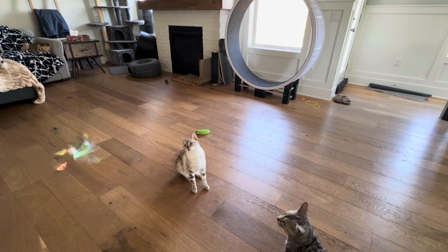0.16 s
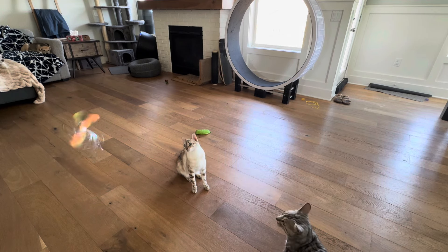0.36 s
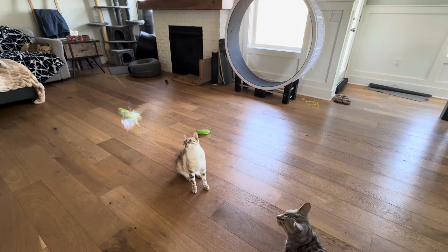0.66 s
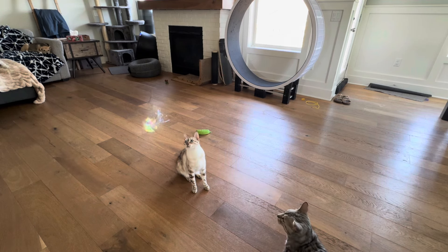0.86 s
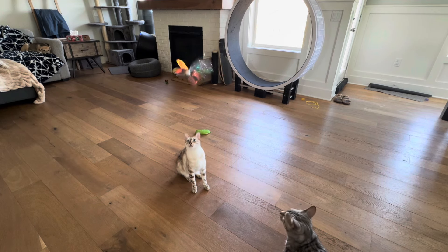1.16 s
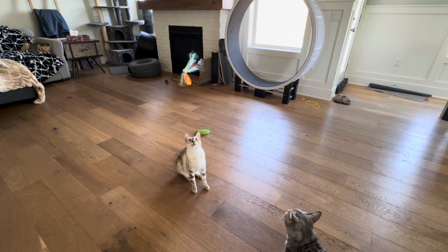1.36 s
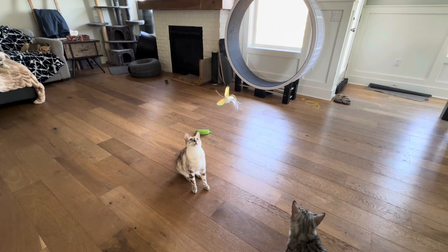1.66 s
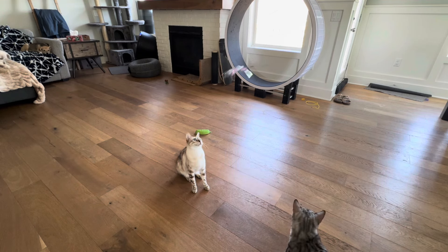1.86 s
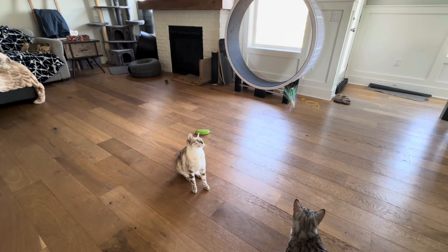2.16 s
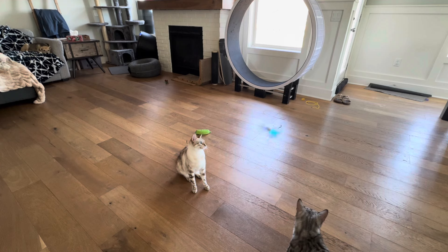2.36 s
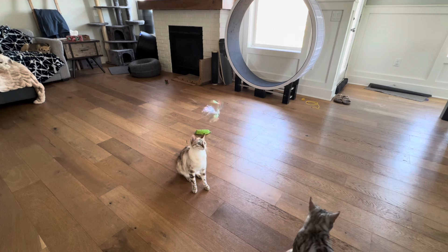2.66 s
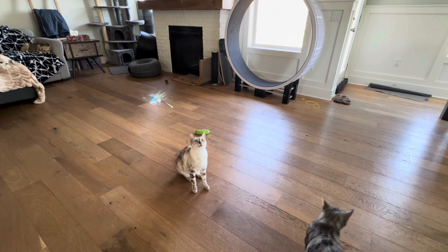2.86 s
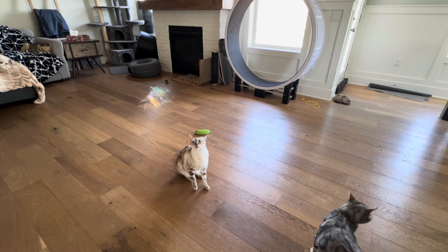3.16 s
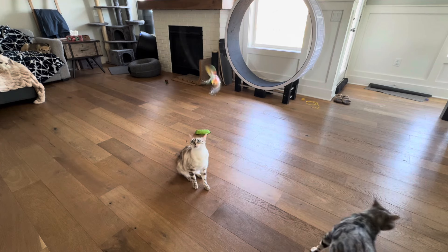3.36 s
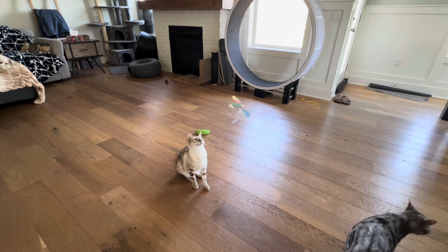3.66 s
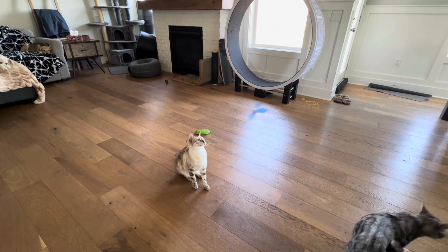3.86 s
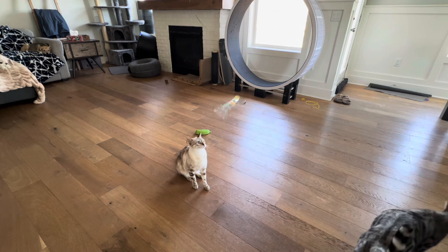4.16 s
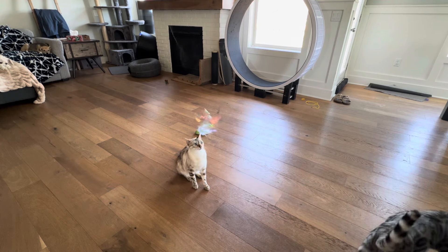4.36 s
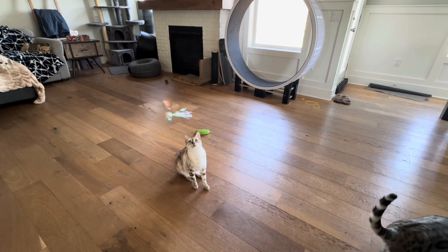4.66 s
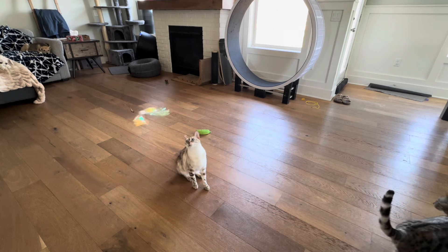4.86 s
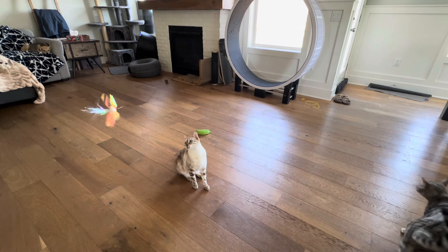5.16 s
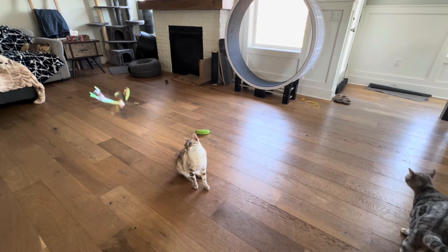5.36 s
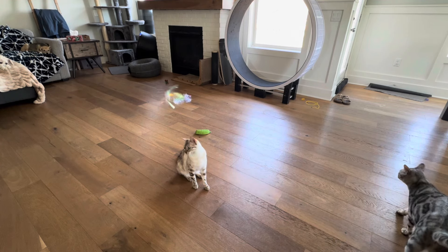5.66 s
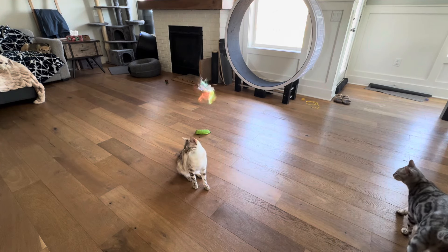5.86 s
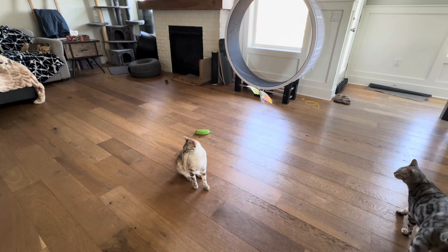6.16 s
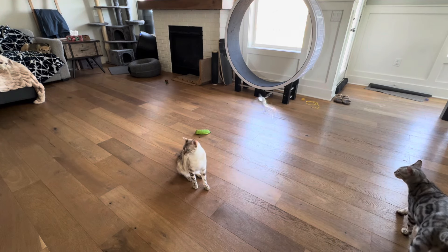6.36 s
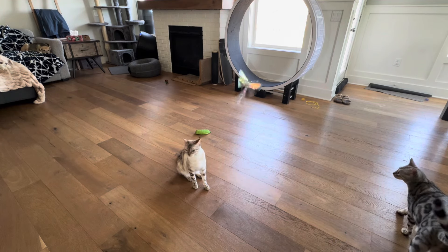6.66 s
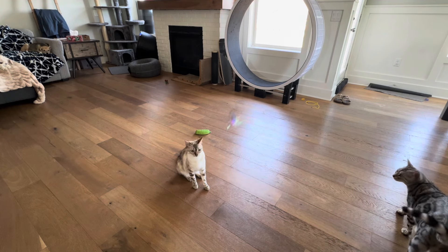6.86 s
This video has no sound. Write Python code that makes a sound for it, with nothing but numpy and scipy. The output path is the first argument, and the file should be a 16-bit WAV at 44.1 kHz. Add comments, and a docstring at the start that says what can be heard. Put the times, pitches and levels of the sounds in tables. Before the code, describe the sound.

A steady, quiet ventilation rush with a wavering low hum lies under the whole seven seconds in a lively, hard-floored living room. At 0.13 s a feather-and-tinsel lure snaps crisply, with a wand tick and a small papery pop; softer jerks follow at 0.4, 0.64 and 0.87, then a clearer snap at 1.1 and a flick at 1.3. From 1.4 to 2 only faint trailing rustle and a tiny tick remain. Activity peaks from 2.0 to 3.1: swishing flutter at 2.2, hard bright snaps at 2.4 and 2.65, flicks near 3.0, with deep soft rumble swelling from 2.7 to 3.4. Uneven crinkling jerks continue, with another rumble around 4.0 to 4.8 and a sharp tick at 4.6. Things soften around 5, then very bright ticks strike at 5.8, more snaps follow at 6.07, 6.25 and 6.47, and a strong glittery wing flick closes at 6.95.

```python
"""A low ventilation hum is heard first; at once a feather-and-tinsel lure on a wand starts to snap and flutter.
Each jerk is a burst of tiny random clicks shaped as a sharp snap and a swelling flutter; wings crinkle and pop.
The wand ticks as short bursts of bright noise, and a bare living room adds a decaying diffuse ring.
Underneath, filtered noise and wavering tones make the ventilation, and an unsteady low tone swells as a rumble."""
import sys
import numpy as np
from scipy import signal
from scipy.fft import rfft, irfft, next_fast_len
from scipy.io import wavfile

SR = 44100
rng = np.random.default_rng(int(sys.argv[2]) if len(sys.argv) > 2 else 0)


def to_wav(s):
    """Save 16-bit WAV."""
    ch = np.atleast_2d(s).T  # columns
    pcm = np.round(np.clip(ch, -1, 1) * 32767)  # PCM
    wavfile.write(sys.argv[1], SR, pcm.astype(np.int16))


N = 309141
TIME = np.arange(N) / SR


def from_db(db):
    """Decibel law: 20 dB is a factor of ten in amplitude."""
    return 10 ** (np.asarray(db) / 20)


def rms_one(x):
    """Power normalisation: scale to a mean square of one."""
    return x / np.sqrt(np.mean(x ** 2) + 1e-20)


def at_hz(points, hz):
    """Interpolation of a table along a logarithmic frequency axis."""
    known_hz, values = np.transpose(points)
    return np.interp(np.log(np.maximum(hz, 1)), np.log(known_hz), values)


def colour(x, points, size=16384):
    """Minimum-phase filtering: the folded cepstrum gives a causal filter with the tabled dB curve."""
    curve_db = at_hz(points, np.fft.rfftfreq(size, 1 / SR))
    cepstrum = irfft(np.log(from_db(curve_db)))
    cepstrum[1:size // 2] *= 2
    cepstrum[size // 2 + 1:] = 0
    response = irfft(np.exp(rfft(cepstrum)))[:size // 2]
    padded = next_fast_len(N + size, real=True)
    return irfft(rfft(x, padded) * rfft(response, padded), padded)[..., :N]


def split(x, hz, order):
    """Crossover: Butterworth filters give the parts below and above one frequency."""
    filters = [signal.butter(order, hz, side, fs=SR, output="sos") for side in ("low", "high")]
    return [signal.sosfilt(sections, x) for sections in filters]


def port_lag(x):
    """Propagation delay: about a third of a millisecond between the ports."""
    return np.roll(x, 16)


def crackle(per_s, spread_db):
    """Random impulse process: tiny buckling clicks of uneven size and either sign, at unit power."""
    born = rng.random(N) < per_s / SR
    chance = rng.standard_normal(N)[born]
    clicks = np.zeros(N)
    clicks[born] = np.sign(chance) * from_db(spread_db * np.minimum(abs(chance), 2.7))
    return rms_one(clicks)


def snap_shape(age, length, attack_s=0.0023):
    """Abrupt arrest: the strands whip round, pull taut and stop within milliseconds."""
    return (1 - np.exp(-age / attack_s)) * np.exp(-(age / length) ** 3)


def flutter_shape(age, length):
    """Half-sine envelope: a swing swells and fades."""
    return np.sin(np.pi * np.minimum(age / length, 1))


def strokes(rows, shape):
    """Incoherent addition: overlapping strokes add in power, for a sound and its parts (dB above it)."""
    power = np.zeros((len(rows[0]) - 2, N))
    for start, level_db, length, *parts_db in rows:
        span = slice(int(start * SR), int((start + np.pi * length) * SR))
        envelope = shape(np.maximum(TIME[span] - start, 0), length)
        gains = from_db(level_db + np.array([0, *parts_db]))
        power[:, span] += np.outer(gains, envelope) ** 2
    return np.sqrt(power)


def flapping(per_s, depth_db):
    """Random amplitude modulation: uneven beating of loose strands, as a gain around 1."""
    beats = rng.standard_normal(N)
    return rms_one(from_db(depth_db * np.interp(TIME * per_s, np.arange(N), beats)))


# spectrum of the air rush: (frequency [Hz], relative density [dB per Hz])
AIR_SPECTRUM = [(20, -33), (35, -10), (55, -3.5), (72, -3), (140, -3.5), (400, -3.5), (520, -12.5),
                (2000, -28.5), (4000, -32), (9000, -33), (15000, -37)]
# likeness of its left and right channels: (frequency [Hz], correlation [-1 to 1])
AIR_CORRELATION = [(40, 0.69), (100, 0.54), (250, 0.73), (500, 0)]
# motor and duct tones: (frequency [Hz], width [Hz], level [dB], left over right [dB])
HUM_TONES = [(56.6, 4.6, -62.5, -2), (84.7, 5, -69.5, -6), (120.2, 2.2, -64, 9), (204.2, 2.5, -69, -8)]


def ventilation(air_db=-58.0):
    """Partial coherence and narrow-band noise: a low rush, unlike left to right in the treble, with wavering tones."""
    size = 2 * next_fast_len(N // 2 + 1)
    alike = at_hz(AIR_CORRELATION, np.fft.rfftfreq(size, 1 / SR))
    white = rfft(rng.standard_normal((2, size)))
    mid, side = irfft(white * np.sqrt([1 + alike, 1 - alike]))[:, :N]
    out = from_db(air_db) * rms_one(colour(np.array([mid + side, mid - side]), AIR_SPECTRUM))
    for hz, width, level_db, pan_db in HUM_TONES:
        knots = rng.standard_normal((2, SR // 100))
        waver = np.interp(TIME * 2 * width, np.arange(knots.shape[1]), knots[0] + 1j * knots[1])
        # the narrower the tone, the steadier its level
        waver = waver / (abs(waver) + 1e-9) ** (1 / (1 + width ** 2))
        tone = rms_one(np.real(waver * np.exp(2j * np.pi * hz * TIME)))
        out = out + tone * from_db([[level_db + pan_db / 2], [level_db - pan_db / 2]])
    return out


# swells of the rumble: (time [s], level [dB], length [s])
RUMBLE_SWELLS = [(1.2, -56, 0.16), (2.73, -49.5, 0.24), (2.97, -52, 0.15), (3.173, -52.5, 0.2),
                 (4.0, -50.5, 0.27), (6.16, -57, 0.27)]


def rumble(boom_hz=56.8, wander_hz=3.7, wanders_per_s=40):
    """Frequency modulation: a deep boom of unsteady pitch swells and fades, alike at both ports."""
    gain = strokes(RUMBLE_SWELLS, flutter_shape)[0]
    wander = np.interp(TIME * wanders_per_s, np.arange(N), rng.standard_normal(N))
    hz = boom_hz + wander_hz * wander
    return gain * rms_one(np.sin(2 * np.pi * np.cumsum(hz) / SR))


# reverberation time, the fall through 60 dB: (frequency [Hz], time [s])
REVERBERATION_TIME = [(400, 0.7), (1400, 0.56), (3500, 0.52), (8000, 0.41), (15000, 0.3)]


def room_response(wet_db=0.7, bass_wet_db=3.5, top_wet_db=-1.0, first_s=0.0015,
                  wall_s=0.056, wall_spread_s=0.0046, wall_share=0.24):
    """Diffuse-field decay: noise dies exponentially band by band, denser where wall and ceiling echoes cluster."""
    age = TIME[:2 ** 15]
    hz = np.fft.rfftfreq(len(age), 1 / SR)
    white = rfft(rng.standard_normal((2, len(age))))
    echoes = np.sqrt(1 + wall_share * np.exp(-((age - wall_s) / wall_spread_s) ** 2))
    onset = (1 - np.exp(-(age / first_s) ** 2)) * echoes
    # bass and top levels are offsets from wet_db
    tilt = [(1500, bass_wet_db), (8000, 0.0043), (14000, top_wet_db)]
    edges = np.geomspace(200, SR / 2, 9)
    response = 0
    for low, high in zip(edges, edges[1:]):
        centre = np.sqrt(low * high)
        decay = onset * np.exp(-np.log(1000) * age / at_hz(REVERBERATION_TIME, centre))
        gain = from_db(wet_db + at_hz(tilt, centre))
        band = irfft(white * ((hz >= low) & (hz < high)))
        response = response + gain * decay / np.linalg.norm(decay) * band
    return response


def direct_response(scatter_db=-0.5, scatter_s=0.00066, shadow_db=4.0):
    """Interaural-like delay and shadow: the left port hears later and weaker; near surfaces smear the sound."""
    age = TIME[:SR // 100]
    response = rng.standard_normal((2, len(age))) * np.exp(-age / scatter_s)
    response *= from_db(scatter_db) / np.linalg.norm(response, axis=1, keepdims=True)
    response[:, 0] = 1
    response[0] = port_lag(response[0])
    shadow = from_db([[-shadow_db / 2], [shadow_db / 2]])
    return response * shadow / np.hypot(1, from_db(scatter_db))


def moving(x, make_response, count=3):
    """Time-varying convolution: the toy moves, so each third of a second takes the next of a cycle of paths."""
    responses = [make_response() for _ in range(count)]
    block = SR // 3
    out = np.zeros((2, N + 2 * SR))
    for k, start in enumerate(range(0, N, block)):
        heard = signal.fftconvolve(x[None, start:start + block], responses[k % count], axes=1)
        out[:, start:start + heard.shape[1]] += heard
    return out[:, :N]


# sharp contacts of wand, line and lure, some full and some thin:
# (time [s], relative level [dB], low cut [Hz])
WAND_TICKS = [(0.134, -23.5, 1200), (1.099, -20, 900), (1.157, -24, 4000), (1.681, -27, 2500),
              (2.412, -18, 2000), (3.043, -22, 1500), (3.523, -21.5, 7000), (3.972, -20.5, 4500),
              (4.026, -21.5, 2000), (4.564, -30, 3500), (4.592, -18, 1000), (4.976, -35, 4000),
              (5.778, -17.5, 7500), (5.815, -13.5, 7000), (6.067, -22, 3000), (6.248, -16, 2000),
              (6.485, -18, 4000), (6.652, -24.5, 5000), (6.827, -25, 4000)]
# their thin, hard spectrum: (frequency [Hz], relative density [dB per Hz])
TICK_SPECTRUM = [(500, -4.5), (2000, 2.5), (6000, -1), (9000, 3.5), (14500, 5.5), (16000, 5)]


def wand(tick_db=0.5, full_length_s=0.0077, length_follows=0.34, count=3):
    """Impact excitation: a bright rattle differs by direction; weaker contacts are shorter, each with its low cut."""
    clicks = np.array([crackle(per_s=15000, spread_db=3.5) for _ in range(count)])
    rattle = rms_one(colour(clicks, TICK_SPECTRUM))
    out = np.zeros((count, N))
    for start, level_db, low_cut_hz in WAND_TICKS:
        length = full_length_s * from_db(length_follows * level_db)
        span = slice(int(start * SR), int((start + np.pi * length) * SR))
        envelope = snap_shape(TIME[span] - TIME[span][0], length)
        tick = from_db(tick_db + level_db) * envelope * rattle[:, span]
        out[:, span] += signal.lfilter(*signal.butter(1, low_cut_hz, "high", fs=SR), tick)
    return out


# a wing pops taut, at a pitch set by how it is bent: (time [s], frequency [Hz], relative level [dB])
TAUT_POPS = [(0.165, 3880, -36.5), (1.307, 2050, -37), (4.125, 2800, -36), (5.659, 1220, -43.5),
             (6.954, 1450, -35.5)]


def wing_pops(length_s=0.0064, quality=1.7, count=3):
    """Damped resonance: a burst of crackles excites one mode of the taut wing."""
    out = np.zeros((count, N))
    drive = np.array([crackle(per_s=SR / 10, spread_db=3) for _ in range(count)])
    for start, hz, level_db in TAUT_POPS:
        span = slice(int(start * SR), int((start + np.pi * length_s) * SR))
        ringing = signal.lfilter(*signal.iirpeak(hz, quality, fs=SR), drive[:, span])
        envelope = snap_shape(TIME[span] - TIME[span][0], length_s)
        out[:, span] += from_db(level_db) * envelope * rms_one(ringing)
    return out


# jerks of the lure, each a snap and then a flutter: (time [s], relative snap level [dB], snap length [s],
# flutter level [dB], flutter length [s], relative body level [dB], relative tinsel sheen level [dB])
LURE_JERKS = [(0.136, -31, 0.0064, -51, 0.043, 6, -1), (0.404, -38.5, 0.0088, -53.5, 0.075, 5, 0.5),
              (0.64, -40.5, 0.015, -41, 0.067, 1.5, -2), (0.874, -33.5, 0.013, -41, 0.078, -1.5, -3),
              (1.099, -30, 0.0073, -51.5, 0.1, 5, -1), (1.303, -35.5, 0.014, -48.5, 0.075, -0.5, 2),
              (2.024, -31.5, 0.0095, -43.5, 0.072, -2, 0), (2.181, -29.5, 0.013, -33, 0.068, 1.5, 2.5),
              (2.412, -23.5, 0.0069, -40.5, 0.082, 2.5, 0.5), (2.526, -36.5, 0.0085, -39, 0.034, 1.5, 1.5),
              (2.657, -21.5, 0.015, -39, 0.047, -2, 5), (2.953, -34.5, 0.0087, -50.5, 0.11, 4.5, 1),
              (3.104, -31.5, 0.022, -36.5, 0.11, -0.5, 1.5), (3.325, -36, 0.018, -37.5, 0.078, 3.5, 3.5),
              (3.512, -38, 0.0047, -45, 0.081, 8, 3.5), (3.764, -30.5, 0.018, -41, 0.017, 1, 5.5),
              (3.898, -37, 0.012, -48.5, 0.047, 4, 2), (4.119, -29, 0.01, -45, 0.08, 2, 2.5),
              (4.535, -43.5, 0.012, -68, 0.042, 7, 0), (4.594, -28, 0.0054, -47, 0.071, 2, 2),
              (4.817, -40.5, 0.01, -41.5, 0.023, 3, -3), (5.004, -48, 0.0097, -45, 0.05, 0, -2),
              (5.224, -40, 0.0064, -42, 0.04, 0.5, -3), (5.415, -38.5, 0.012, -45.5, 0.099, 2.5, -1),
              (5.657, -30, 0.0089, -47.5, 0.082, 1.5, 0.5), (5.807, -31.5, 0.019, -42, 0.13, 3, 0.5),
              (6.07, -31.5, 0.0072, -43, 0.07, 2, 0), (6.253, -32, 0.0095, -40.5, 0.048, 0, 1.5),
              (6.469, -35, 0.015, -37, 0.046, 0, -3.5), (6.765, -37, 0.0088, -47.5, 0.036, 4.5, 5),
              (6.936, -33, 0.016, -36.5, 0.065, 1.5, 9)]
# a wing flicks over in mid-swing: (time [s], relative level [dB])
WING_FLICKS = [(0.164, -36), (0.708, -33), (0.921, -31), (0.954, -41), (1.164, -34), (1.283, -38),
               (2.961, -31.5), (3.009, -31), (3.044, -26.5), (3.486, -38.5), (3.754, -36), (4.026, -32),
               (4.759, -39.5), (5.318, -41.5), (5.646, -37), (5.843, -29), (6.087, -29), (6.146, -36.5),
               (6.483, -30.5), (6.528, -33.5), (6.956, -23.5)]
# every flick is equally short and has the same relative share of the wing's body
FLICK_S, FLICK_BODY_DB = 0.0088, -0.5


def snapping():
    """Impulsive envelopes of tinsel, body and sheen: one snap for each jerk, and the flicks."""
    snaps = [(start, snap_db, length, body_db, sheen_db)
             for start, snap_db, length, _, _, body_db, sheen_db in LURE_JERKS]
    flicks = [(start, level_db, FLICK_S, FLICK_BODY_DB, 0) for start, level_db in WING_FLICKS]
    return strokes(snaps + flicks, snap_shape)


# faint rustle of the lure trailing through the air between jerks: (time [s], level [dB])
TRAILING_RUSTLE = [(0, -75), (0.3, -60.5), (0.56, -69.5), (0.84, -55), (1.05, -68), (1.5, -62.5),
                   (1.58, -55.5), (1.8, -61.5), (1.92, -80), (2.3, -59.5), (3.6, -55), (4.42, -62),
                   (4.8, -54), (4.95, -64.5), (5.15, -61.5), (5.3, -58), (7, -59)]
# body of the trailing rustle, and the sheen added to everything in flight
TRAILING_BODY_DB, FLIGHT_SHEEN_DB = 4, 0.5


def swinging():
    """Power addition of envelopes in flight: a flutter for each jerk and a faint, uneven trailing rustle."""
    flutters = [(start, flutter_db, length, body_db, sheen_db + FLIGHT_SHEEN_DB)
                for start, _, _, flutter_db, length, body_db, sheen_db in LURE_JERKS]
    trailing_db = np.interp(TIME, *np.transpose(TRAILING_RUSTLE))
    trailing = from_db(trailing_db) * flapping(per_s=76, depth_db=4.0)
    parts = from_db([[0], [TRAILING_BODY_DB], [FLIGHT_SHEEN_DB]])
    return np.hypot(strokes(flutters, flutter_shape), trailing * parts)


def crinkle(per_s=170, quality=5.9, count=22):
    """Modal buckling: creases of many sizes buckle at random, each ringing briefly at its own pitch."""
    out = 0
    for hz in np.geomspace(400, 10000, count):
        clicks = crackle(per_s, spread_db=6.0) + 1e-18
        out = out + signal.lfilter(*signal.iirpeak(hz, quality, fs=SR), clicks)
    return out


# spectrum of thin tinsel: (frequency [Hz], relative density [dB per Hz])
TINSEL_SPECTRUM = [(1000, -49), (2500, -19), (4000, -4.5), (5500, 0), (9800, 1), (11300, 0), (14500, 2),
                   (16000, -9)]
SHEEN_HZ = 9400


def tinsel(gain, sheen_gain, per_s, spread_db, count=3):
    """Band-wise modulation: crackling foil from several directions, its treble sheen under a gain of its own."""
    clicks = np.array([crackle(per_s, spread_db) for _ in range(count)])
    foil = rms_one(colour(clicks, TINSEL_SPECTRUM))
    rustle, sheen = split(foil, SHEEN_HZ, order=3)
    return gain * rustle + sheen_gain * sheen


# papery body of feathers and wings: (frequency [Hz], relative gain [dB])
BODY_SPECTRUM = [(150, -15), (400, -8), (1050, -1), (3000, -1), (5000, -1.5), (10000, -17)]


def lure(snap_db=-1.0, body_db=-11.0, slide_db=-11.5, slide_s=0.0035, count=3):
    """Click density: a snap buckles the strands in a dense burst, flight in a sparser one; the wings crinkle."""
    snaps = from_db(snap_db) * snapping()
    # the strands begin to slide just before they whip round
    slides = from_db(slide_db) * np.roll(snaps, -int(slide_s * SR), axis=1)
    snap, snap_body, snap_sheen = np.hypot(snaps, slides)
    flutter, flutter_body, flutter_sheen = swinging() * flapping(per_s=300, depth_db=3.0)
    body = rms_one(colour(np.array([crinkle() for _ in range(count)]), BODY_SPECTRUM))
    snap_foil = tinsel(snap, snap_sheen, per_s=12000, spread_db=9.5)
    flutter_foil = tinsel(flutter, flutter_sheen, per_s=4500, spread_db=9.0)
    return snap_foil + flutter_foil + from_db(body_db) * np.hypot(snap_body, flutter_body) * body


def scene(wand_wet_db=-1.5):
    """Direct and reverberant fields: the lure is out in the room; the wand is nearer and drier."""
    toy, ticks = lure() + wing_pops(), wand()
    # every direction feeds the room by its own paths; only the first points at the microphone
    rays = toy + from_db(wand_wet_db) * ticks
    ring = sum(moving(ray, room_response) for ray in rays) / np.sqrt(len(toy))
    direct = moving(toy[0] + ticks[0], direct_response, count=21)
    return direct + ring + ventilation() + rumble()


# colour of each microphone port: (frequency [Hz], gain [dB])
LEFT_PORT_COLOUR = [(1200, 2.5), (2500, 2), (3300, 4.5), (7000, 4.5), (10500, 1)]
RIGHT_PORT_COLOUR = [(1200, 0), (3300, 2), (5000, 0.5), (7500, 2.5), (8200, 6), (9050, 9.5), (9900, -0.5)]
# narrow notch common to both ports: (frequency [Hz], quality of one pass)
SHARED_NOTCH = (12880, 18)
# above the first, the right port feeds both channels; above the second, little passes
SHARED_ABOVE_HZ, CUTOFF_HZ = 11540, 15750


def record(dry):
    """Linear filtering: each port colours its channel; the right port gives both tops; all is notched and cut."""
    ported = np.array([colour(dry[0], LEFT_PORT_COLOUR), colour(dry[1], RIGHT_PORT_COLOUR)])
    low, top = split(ported, SHARED_ABOVE_HZ, order=7)
    shared_top = np.array([port_lag(top[1]), top[1]])
    notch = signal.tf2sos(*signal.iirnotch(*SHARED_NOTCH, fs=SR))
    # the notch is applied twice
    joined = signal.sosfilt(np.vstack([notch, notch]), low + shared_top)
    return signal.sosfilt(signal.ellip(12, .2, 80, CUTOFF_HZ, fs=SR, output="sos"), joined)


dry = scene()
out = record(dry)
to_wav(out)
```